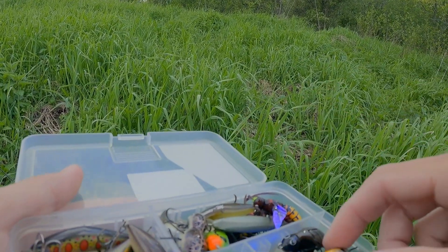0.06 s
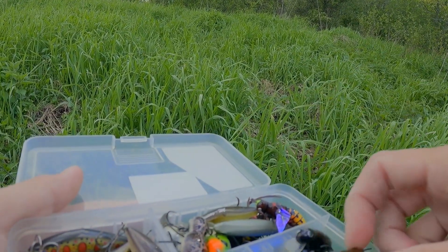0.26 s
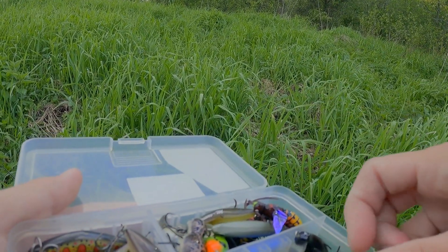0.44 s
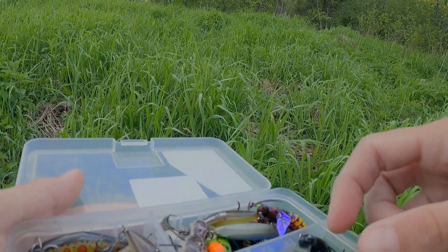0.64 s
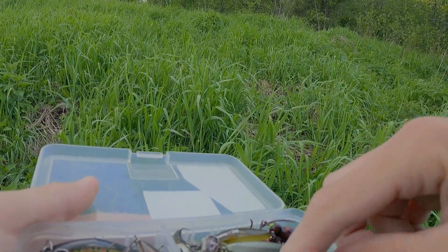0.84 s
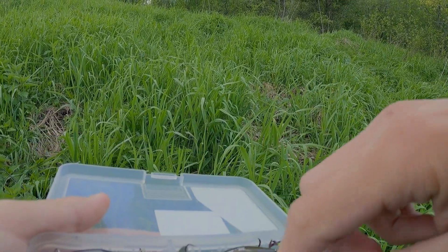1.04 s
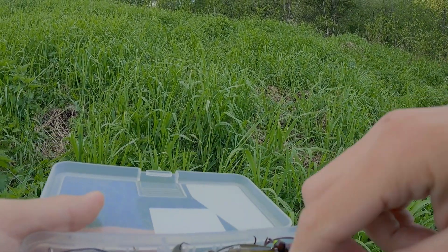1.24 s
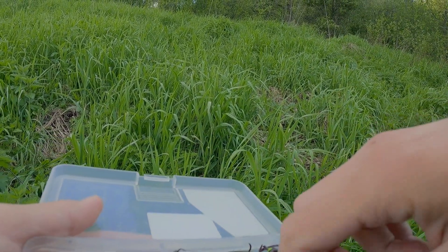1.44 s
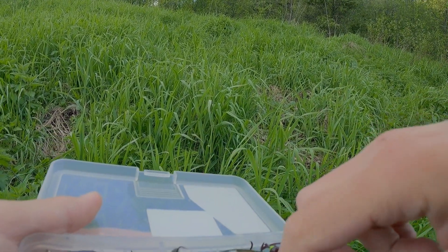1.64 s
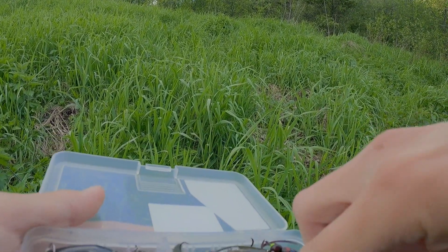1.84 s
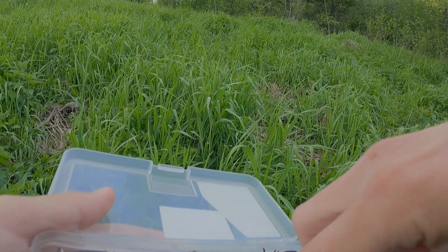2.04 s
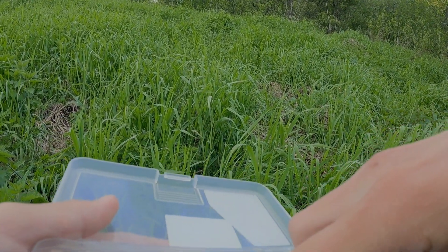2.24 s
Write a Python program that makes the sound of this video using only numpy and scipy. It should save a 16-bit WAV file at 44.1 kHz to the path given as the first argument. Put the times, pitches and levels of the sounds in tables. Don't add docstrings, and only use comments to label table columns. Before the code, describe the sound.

Close dry rattling and clicking of fishing lures stirred by hand in a plastic box, quiet meadow behind

```python
import sys
import numpy as np
from scipy import signal
from scipy.fft import rfft, irfft, next_fast_len
from scipy.io import wavfile
from scipy.ndimage import uniform_filter1d

SR = 44100
rng = np.random.default_rng(int(sys.argv[2]) if len(sys.argv) > 2 else 0)


def file_out(sig):
    cols = np.atleast_2d(sig).T
    lim = np.clip(cols, -1, 1)
    pcm = np.round(lim * 32767).astype(np.int16)
    wavfile.write(sys.argv[1], SR, pcm)


def decibels_to_gain(level_db):
    exponent = np.asarray(level_db, float) / 20
    return 10 ** exponent


N = 99225

# frequency in Hz, gain in dB.
CRACK_SPECTRUM = [(300, -52.5), (2000, -5.5), (5000, 5), (8000, -4), (12000, -13), (15500, -30)]
# frequency in Hz, gain in dB.
WALL_SPECTRUM = [(70, -12), (200, -2), (1000, -7), (2500, -23)]
WALL_T60_S = 0.04
NEAR_ALIKE = 0.83
TOP_HZ = 13000


def unit(x):
    return x / np.sqrt(np.mean(x ** 2) + 1e-20)


def along(points, hz):
    f, v = np.transpose(points)
    return np.interp(np.log(hz + 1), np.log(f + 1), v)


def coloured(x, gain_db):
    m = 2 * next_fast_len(N // 2 + 4096)
    gain = decibels_to_gain(gain_db(np.fft.rfftfreq(m, 1 / SR)))
    cepstrum = irfft(np.log(gain / np.sqrt(np.mean(gain ** 2)) + 1e-6), m)
    cepstrum = cepstrum * np.r_[1, 2 * np.ones(m // 2 - 1), 1, np.zeros(m // 2 - 1)]
    return irfft(rfft(x, m) * np.exp(rfft(cepstrum)), m)[..., :N]


def placed(times_s, rows):
    at = np.round(np.asarray(times_s) * SR).astype(int)[:, None] + np.arange(rows.shape[1])
    return np.bincount(at.clip(0).ravel(), rows.ravel(), N + SR)[:N]


def pair(a, b, alike):
    angle = np.arccos(np.clip(alike, 0, 1)) / 2
    common, differing = np.cos(angle) * a, np.sin(angle) * b
    return np.array([common + differing, common - differing])


def patchy(x, depth_db):
    z = signal.stft(x, nperseg=128)[2]
    field = rng.standard_normal(z.shape[1:])
    field = uniform_filter1d(uniform_filter1d(field, size=5, axis=0), size=5, axis=1)
    return signal.istft(z * decibels_to_gain(depth_db * unit(field)), nperseg=128)[1][:, :N]


def port(hz):
    # centre in Hz, half width in Hz, gain in dB.
    peaks = [(2397, 350, 8), (3540, 83, 6), (5180, 370, 4), (11500, 580, 0.5)]
    return sum(db / (1 + ((hz - c) / w) ** 2) for c, w, db in peaks)


def snaps():
    # start in seconds, peak in dB, brightness and body in dB over
    contacts = [(0.0729, -32.5, -9, 4), (0.0791, -29, -17, -17), (0.0988, -27.5, -14.5, 2.5),
                (0.1785, -35.5, -27, -2), (0.1815, -37, -15, 1.5), (0.2176, -18.5, -13.5, -26),
                (0.247, -28, -5, 3.5), (0.2508, -25.5, -8, -3), (0.2598, -17.5, -8, -5),
                (0.2908, -41.5, -22, 1.5), (0.3841, -25.5, -8.5, -0.5), (0.3927, -25.5, -5, -24),
                (0.4234, -23.5, -4, -26), (0.4276, -21, 9, -6), (0.4373, -11.5, -4.5, -13.5),
                (0.4449, -21, -26, 2), (0.4558, -35, -28, 6), (0.4639, -10, -20, -36.5),
                (0.4759, -19, -12, -1), (0.4808, -15, -22.5, -7.5), (0.4872, -12.5, -11, -14),
                (0.4959, -16, -18, -10), (0.4995, -13, -5.5, -6), (0.5064, -16, -7, -27),
                (0.5143, -15.5, -8.5, -34), (0.5276, -40, -26, -5), (0.5336, -38, -27, -0.5),
                (0.5392, -33, -12.5, -10),
                (0.9316, -32.5, -16, -31), (0.9733, -29, -6, -10), (1.0327, -34, -27, -8),
                 (1.0359, -30, -31, -16), (1.0747, -31, -2, -2), (1.078, -23.5, -30, -20),
                 (1.0878, -25.5, -18, -5.5), (1.1148, -40.5, 0, -14), (1.1346, -37, -2, 3),
                 (1.1474, -46, -8, -2), (1.1568, -18.5, -32, -8), (1.1737, -26, -9, 1),
                 (1.1784, -15.5, -14, -2.5), (1.1886, -19.5, -9, -7.5), (1.1997, -25, -13, -6),
                 (1.2042, -26, -6.5, -8), (1.212, -32, -13, -11), (1.341, -38.5, 2, -12),
                 (1.3482, -30, -20, -27), (1.3645, -19.5, -19, -12), (1.38, -29, -4, -26),
                 (1.3862, -36, -7.5, 5), (1.395, -18.5, 0.5, -5.5), (1.4045, -20.5, -9, -21),
                 (1.4104, -25, -13, -16), (1.429, -35, -24, 2), (1.4348, -21, -12.5, -7.5),
                 (1.4634, -31, -12, -6), (1.476, -26, -3.5, -9), (1.4847, -33.5, -6.5, -17),
                 (1.4983, -38.5, -14, 3),
                (1.5598, -23, -12, -28), (1.5732, -9.5, -10, -13.5), (1.5864, -27, -17, -22),
                 (1.5978, -41, -1, -17), (1.604, -21.5, -18, -15), (1.6101, -18.5, -8.5, -9),
                 (1.635, -41, -7, 8), (1.6497, -32, -22, -23), (1.6578, -17, -2.5, -10.5),
                 (1.6637, -18.5, -13, -2.5), (1.6817, -41.5, -13, 15), (1.69, -21.5, -3.5, -3),
                 (1.713, -33, -11, -12), (1.7196, -18, -9, -6), (1.7262, -14.5, -10, -1),
                 (1.7359, -19.5, -11.5, -25), (1.7391, -19, -3, -1), (1.7455, -24.5, -1, -7),
                 (1.7544, -33, -2, -17), (1.761, -20.5, -12, -21), (1.783, -43, -22, -12),
                 (1.7972, -27.5, -4, -19), (1.8071, -25, -7.5, -33), (1.8219, -27, -4, -27),
                 (1.8398, -30.5, -14, -23),
                (1.851, -38, -15, -9), (1.8578, -41, -15, -12), (1.8652, -34, -13, -12),
                 (1.8766, -24, -16, -9), (1.8835, -14.5, -15, -19), (1.8894, -25, -1, 4),
                 (1.8934, -13, -8, -7), (1.898, -17.5, 3.5, -14), (1.9026, -12.5, -12.5, -14),
                 (1.9118, -31, 0.5, -26), (1.9186, -17, -10, -16), (1.9414, -28, -1, -3),
                 (1.9564, -10.5, -8, -14), (1.9683, -27.5, 1, -5), (1.976, -33.5, 2, -25),
                 (2.0011, -50, 11, -17), (2.0947, -38.5, 5.5, -19), (2.1144, -38, 5, -14),
                 (2.1962, -34, -6, -20), (2.2125, -43.5, 6.5, -19.5), (2.2335, -40.5, 6, 0),
                 (2.2458, -26.5, -4, -4)]
    settling_s = [.563, .578, .595, .613, .625, .641, .672, .682]
    # frequency in Hz, level in dB, t60 in seconds.
    modes = [
        (2378, 5.5, 0.0085),
        (1713, 11, 0.0042),
        (3472, 0, 0.0091),
        (5060, -3.5, 0.0084),
    ]
    scatter = [.035, .12, .04, .07]
    ring_db, ring_swing_db, attack_s = 3.5, 4, 0.0004
    crack_db, crack_t60_s = 2.5, 0.0053
    after_db, after_t60_s = -10.5, 0.025
    knock_db, knock_swing_db = -24, 4.5

    rows = contacts + [(s, -57, -20, -20) for s in settling_s]
    s, db, bright_db, body_db = np.transpose(rows)[:, :, None]
    start_s = s[:, 0]
    t = np.arange(SR // 16) / SR
    z = rng.standard_normal((len(rows), 2 * len(modes) + 1, 1))
    noise = rng.standard_normal((4, len(rows), len(t)))
    rise = (1 - np.exp(-t / attack_s)) ** 2

    colour_db = [0, body_db, bright_db + ring_swing_db * z[:, 4], bright_db + ring_swing_db * z[:, 6]]
    ring = 0
    for k, (hz, mode_db, t60_s) in enumerate(modes):
        tuned_hz = hz * (1 + scatter[k] * z[:, 2 * k + 1])
        ring = ring + decibels_to_gain(mode_db + colour_db[k] - 60 * t / t60_s) * np.sin(2 * np.pi * tuned_hz * t)
    ring = decibels_to_gain(db + ring_db) * ring * rise
    again = rng.random((len(rows), 2))
    rings = placed(start_s, ring)
    rings = rings + placed(start_s + 0.000978 + 0.002096 * again[:, 0], 0.94 * again[:, 1:] * ring)

    decay = decibels_to_gain(-60 * t / crack_t60_s) + decibels_to_gain(after_db - 60 * t / after_t60_s)
    fall = rise * decibels_to_gain(db + bright_db + crack_db) * decay
    crack = coloured([placed(start_s, fall * n) for n in noise[:2]],
                     lambda hz: along(CRACK_SPECTRUM, hz) + 1.43 * port(hz))

    wall_db = db + body_db + knock_db + knock_swing_db * z[:, -1]
    wall = rise * decibels_to_gain(wall_db - 60 * t / WALL_T60_S)
    knock = coloured([placed(start_s, wall * n) for n in noise[2:]], lambda hz: along(WALL_SPECTRUM, hz))
    return patchy(crack, depth_db=5.0) + knock + rings * [[1], [0.3]]


def swell(rows):
    t = np.arange(N) / SR
    return sum(decibels_to_gain(db) * np.sin(np.pi * np.clip((t - s) / length, 0, 1)).clip(0) ** 0.89
               for s, length, db in rows)


def grains(smooth):
    grains_per_s, spread_db = 700, 7
    u = rng.random((2, N))
    ticks = (u[0] < grains_per_s / SR) * decibels_to_gain(-spread_db * np.log(u[1] + 0.03))
    burst = np.convolve(ticks, np.hanning(70))[:N]
    return (unit(burst) + smooth) * rng.standard_normal((2, N))


def rustle():
    # start in seconds, length in seconds, level in dB.
    drags = [(-.03, 0.065, -53), (0.073, 0.045, -40.5), (0.131, 0.065, -58.5), (0.195, 0.12, -50),
             (0.319, 0.1, -51.5), (0.417, 0.13, -34.5), (0.89, 0.27, -54), (1.066, 0.055, -55),
             (1.121, 0.1, -38.5), (1.213, 0.091, -56.5), (1.318, 0.22, -47), (1.534, 0.1, -40.5),
             (1.65, 0.051, -49), (1.699, 0.14, -44.5), (1.83, 0.16, -43), (1.975, 0.078, -50),
             (2.066, 0.096, -47), (2.16, 0.41, -44.5)]
    # start in seconds, length in seconds, level in dB.
    slides = [
        (1.965, 0.087, -45),
        (.24, 0.05, -59.5),
    ]
    # frequency in Hz, density in dB per Hz.
    heap = [(100, -47), (200, -17), (1100, -12), (2400, -4), (3200, -7), (6000, -28.5)]
    smooth_share, bright_over_dull_db = 1, -7.5

    drag = swell(drags)
    drag = drag + 0.5 * uniform_filter1d(drag, SR // 20)
    dull = unit(coloured(drag * grains(smooth_share), lambda hz: along(heap, hz) + port(hz)))
    fizz = unit(coloured(drag * grains(smooth_share / 2), lambda hz: along(CRACK_SPECTRUM, hz) + port(hz)))
    slide = unit(coloured(grains(smooth_share),
                          lambda hz: along(CRACK_SPECTRUM, hz) + port(hz) + 20 * np.log10(hz + 1)))
    dragged = dull + decibels_to_gain(bright_over_dull_db) * patchy(fizz, depth_db=4.0)
    return swell(slides) * slide + np.sqrt(np.mean(drag ** 2)) * dragged


def thuds():
    # start in seconds, level in dB.
    jolts = [
        (.08, -44),
        (.498, -30.5),
        (1.393, -40),
        (1.734, -42),
        (1.914, -38),
    ]
    s, db = np.transpose(jolts)
    t = np.arange(SR // 8) / SR
    rows = decibels_to_gain(db[:, None] - 60 * t / (2 * WALL_T60_S)) * rng.standard_normal((len(s), len(t)))
    return coloured(placed(s, rows), lambda hz: along(WALL_SPECTRUM, hz))


def bumps():
    # centre in seconds, level in dB.
    pushes = [
        (.755, -58),
        (0.865, -51.5),
        (1.003, -50),
        (1.741, -56),
        (1.924, -49),
    ]
    push_hz, push_s = 29.5, 0.012
    s, db = np.transpose(pushes)
    t = np.arange(-SR // 16, SR // 16) / SR
    push = np.exp(-0.5 * (t / push_s) ** 2) * np.sin(2 * np.pi * push_hz * t)
    return placed(s - 1 / 16, decibels_to_gain(db)[:, None] * push)


def note(s, length, start_hz, end_hz, db):
    u = np.clip((np.arange(N) / SR - s) / length, 0, 1)
    return decibels_to_gain(db) * np.sin(np.pi * u) * np.sin(2 * np.pi * np.cumsum(start_hz + (end_hz - start_hz) * u) / SR)


def birds():
    # time in seconds, frequency in Hz, level in dB.
    whistle = [
        (0.864, 2850, -65),
        (0.877, 3620, -57),
        (.9, 3675, -58),
        (.924, 3620, -54),
        (0.935, 3426, -53.5),
        (1.03, 3215, -57),
        (1.065, 3000, -70),
    ]
    # start in seconds, length in seconds, start in Hz, end in Hz, level in dB.
    glides = [(0.042, 0.026, 2460, 2630, -53.5), (0.039, 0.011, 3680, 3600, -57),
              (.638, 0.018, 3530, 4920, -63), (0.65, 0.013, 2770, 3670, -55.5),
              (.66, 0.011, 2980, 3380, -58), (0.686, 0.045, 3500, 2080, -65),
              (0.693, 0.046, 1970, 1650, -70), (0.81, .007, 3900, 3000, -59),
              (0.824, 0.0058, 3900, 2780, -52.5), (0.833, 0.0075, 2790, 3920, -56),
              (.838, 0.0084, 3950, 2830, -52.5), (0.853, 0.0086, 3500, 3240, -46.5)]
    cheep_start_s, cheep_every_s, cheep_s = 0.098, 0.1885, 0.014
    cheep_hz, cheep_db, wet = 6660, -61.5, 0.45

    t = np.arange(N) / SR
    s, hz, db = np.transpose(whistle)
    x = decibels_to_gain(np.interp(t, s, db, -120, -120)) * np.sin(2 * np.pi * np.cumsum(np.interp(t, s, hz)) / SR)
    x = patchy(x[None], depth_db=2.5)[0] + sum(note(*row) for row in glides)
    for k in range(3, 6):
        x = x + note(cheep_start_s + k * cheep_every_s, cheep_s, cheep_hz, cheep_hz, cheep_db)
    tail = rng.standard_normal((2, SR // 8)) * decibels_to_gain(-60 * np.arange(SR // 8) / SR * 7.47)
    smeared = signal.fftconvolve(x[None], tail / np.linalg.norm(tail[0]), axes=1)[:, :N]
    return x * decibels_to_gain([[1], [-1]]) + wet * smeared


def meadow():
    # frequency in Hz, density in dB per Hz.
    air_spectrum = [(30, -5.5), (80, -26.5), (170, -3), (700, -26), (2000, -22), (3300, -15.5), (7000, -26),
                    (9000, -48)]
    air_db, air_alike = -64.5, 0.62
    buzz_start_s, buzz_every_s, buzz_s = 0.0105, 0.0628, 0.032
    buzz_hz, buzz_width_hz, buzz_db = 5450, 420, -67

    air = coloured(rng.standard_normal((2, N)), lambda hz: along(air_spectrum, hz))
    u = (np.arange(N) / SR - buzz_start_s) % buzz_every_s / buzz_s
    pulse = np.sin(np.pi * u.clip(0, 1))
    buzz = coloured(rng.standard_normal((2, N)), lambda hz: -12 * ((hz - buzz_hz) / buzz_width_hz / 2) ** 4)
    water = decibels_to_gain(air_db) * pair(*patchy(air, depth_db=2.0), air_alike)
    return water + decibels_to_gain(buzz_db) * pulse * pair(*buzz, NEAR_ALIKE)


def scene():
    # frequency in Hz, left minus right in dB.
    balance = [(500, -3), (1300, -6.5), (2400, -4.5), (9000, -0.5)]
    near = pair(*(snaps() + rustle()), NEAR_ALIKE) + bumps() + thuds()
    hz = np.fft.rfftfreq(N, 1 / SR)
    tilt_db = np.array([[0.5], [-0.5]]) * along(balance, hz)
    turn = np.exp(0.5j * np.array([[1], [-1]]) * (hz > TOP_HZ - 1000))
    return irfft(rfft(near) * decibels_to_gain(tilt_db) * turn, N) + birds() + meadow()


def roll_off(x):
    return signal.sosfilt(signal.butter(12, 16450, fs=SR, output="sos"), x)


def record(dry):
    fall_db = -4 * ((np.fft.rfftfreq(N, 1 / SR) - TOP_HZ).clip(0) / 1000) ** 1.5
    soft = 0.83 * np.tanh(dry / 0.79)
    return roll_off(irfft(rfft(soft) * decibels_to_gain(fall_db), N))


dry = scene()
out = record(dry)
file_out(out)
```